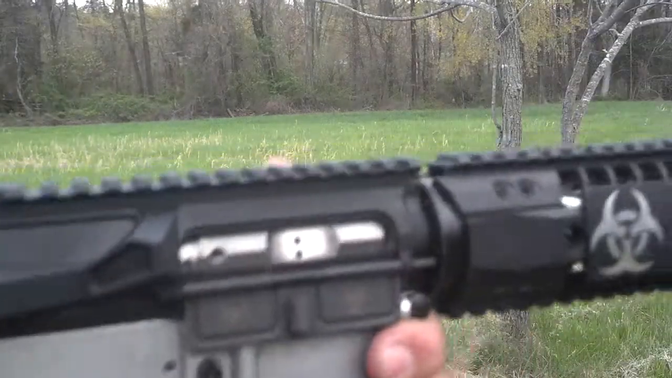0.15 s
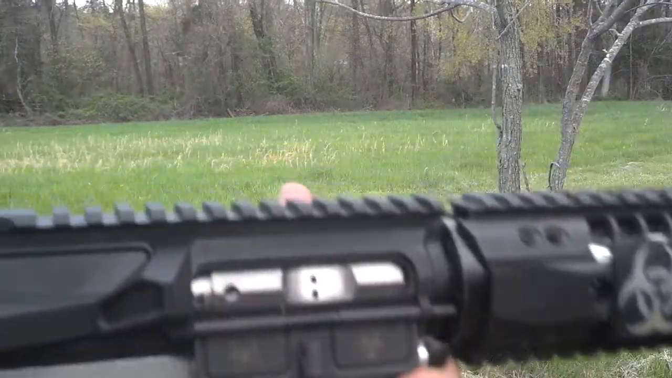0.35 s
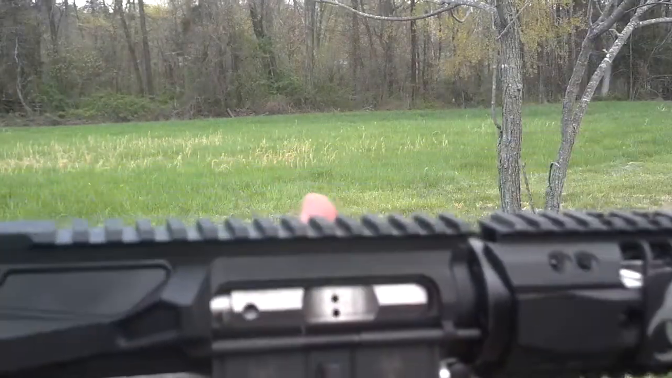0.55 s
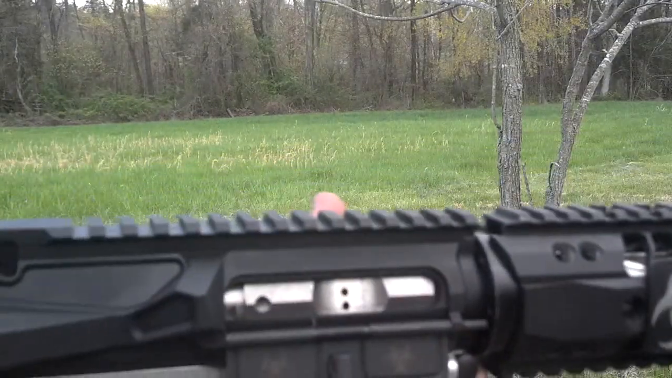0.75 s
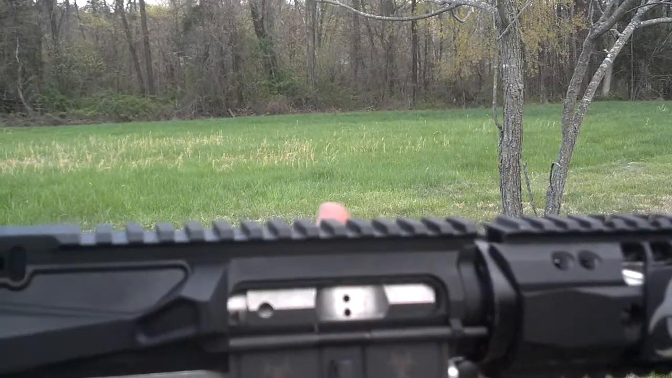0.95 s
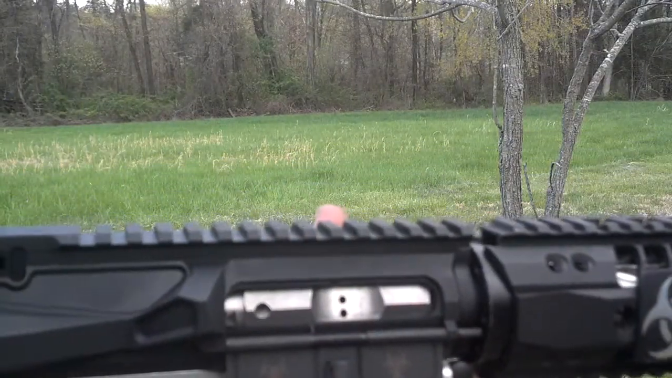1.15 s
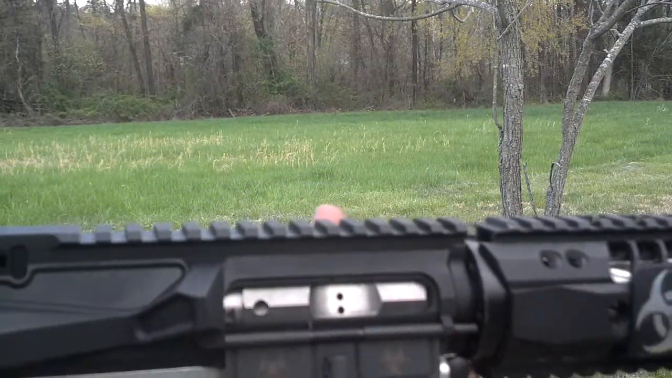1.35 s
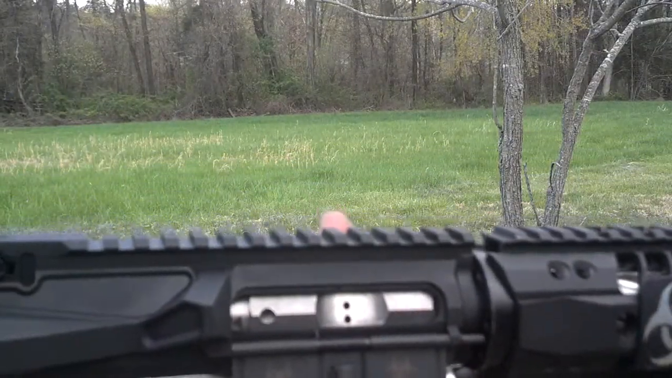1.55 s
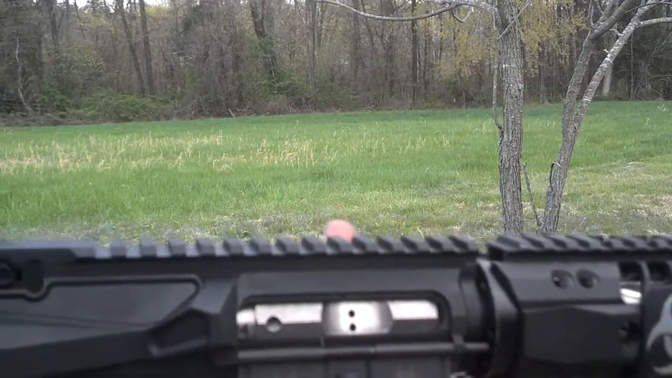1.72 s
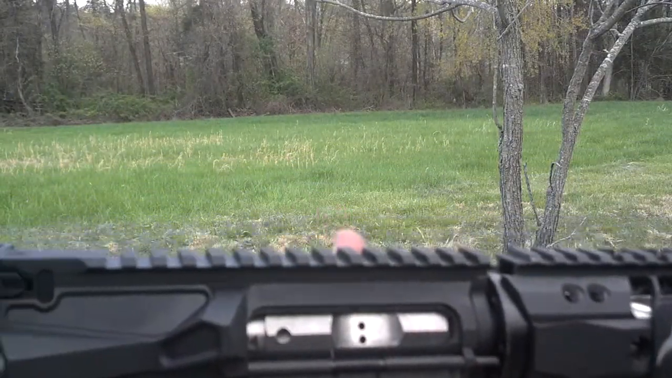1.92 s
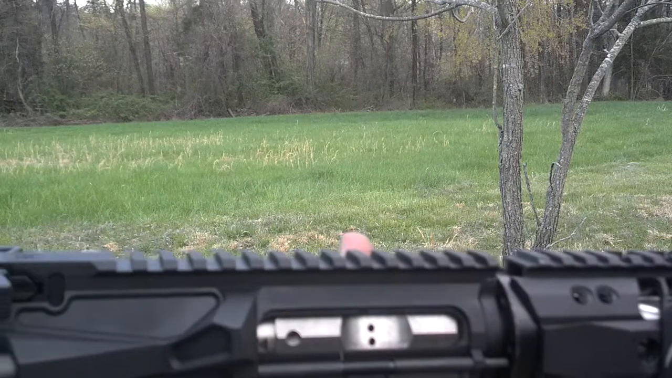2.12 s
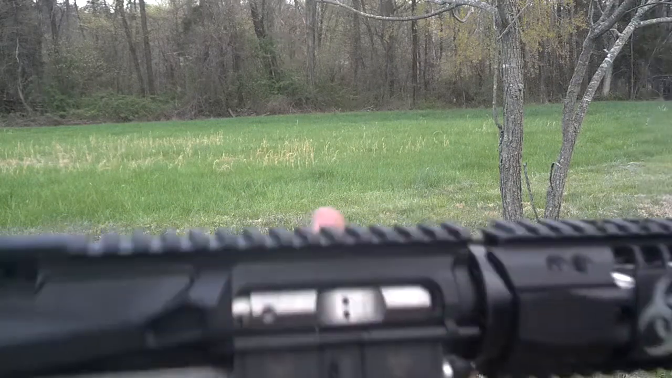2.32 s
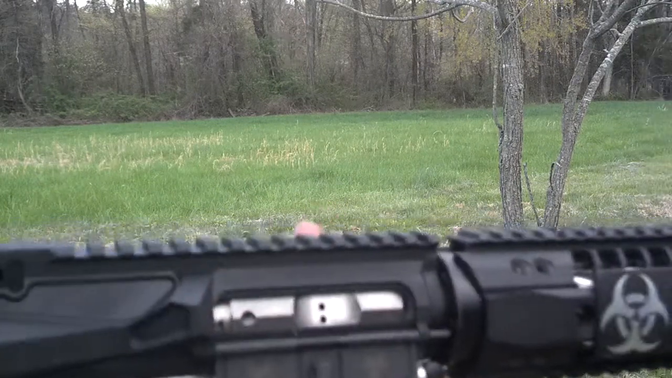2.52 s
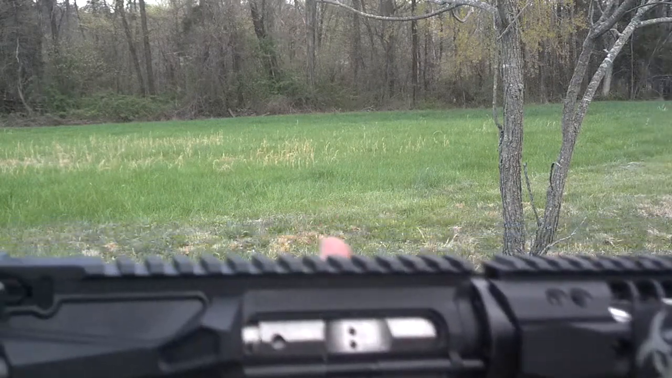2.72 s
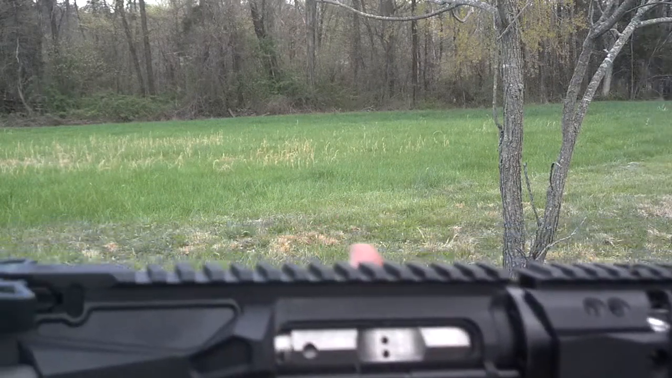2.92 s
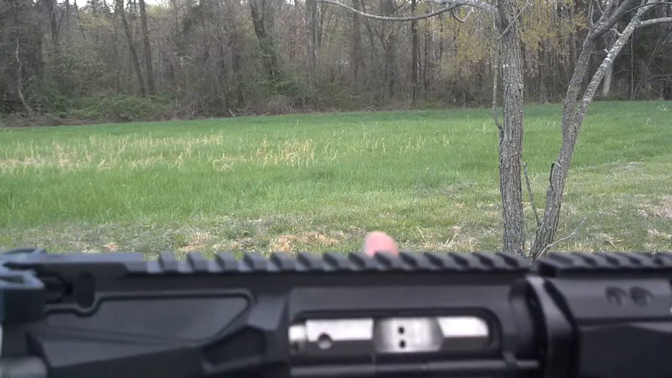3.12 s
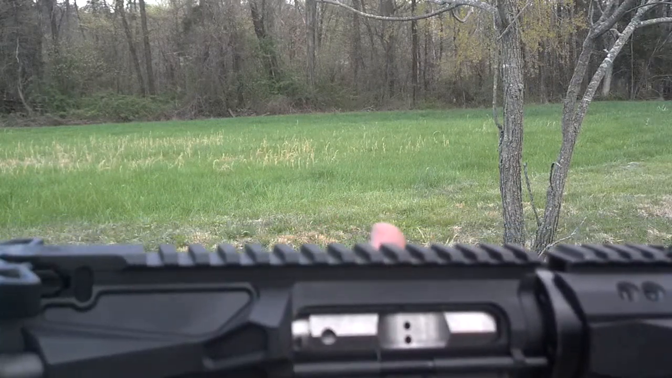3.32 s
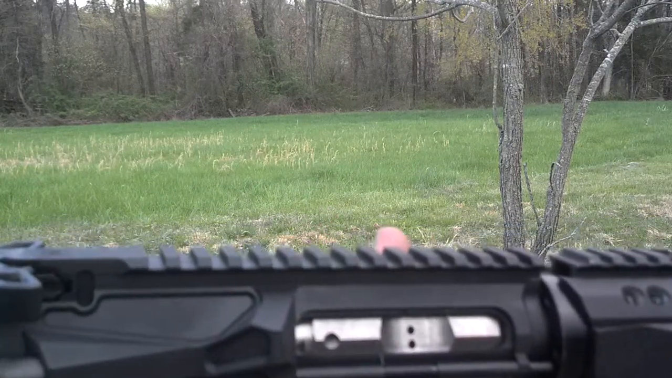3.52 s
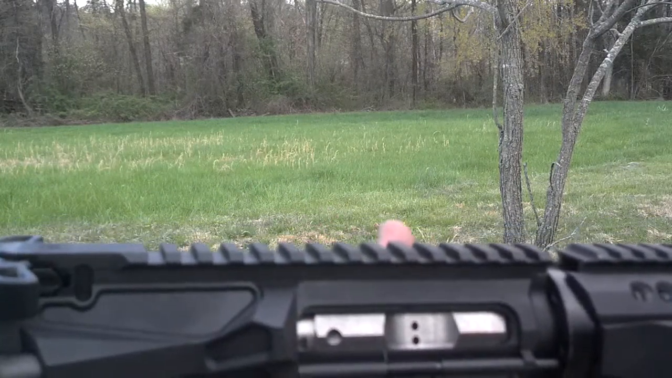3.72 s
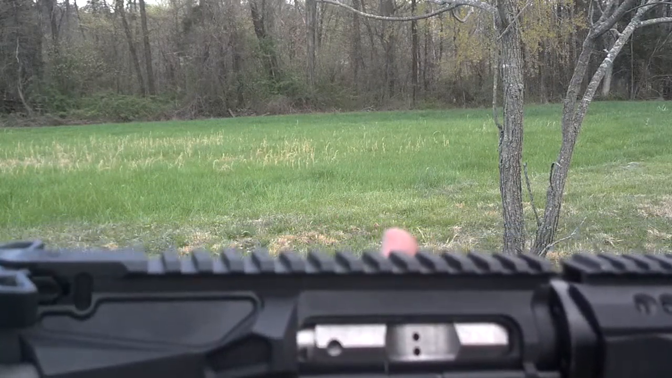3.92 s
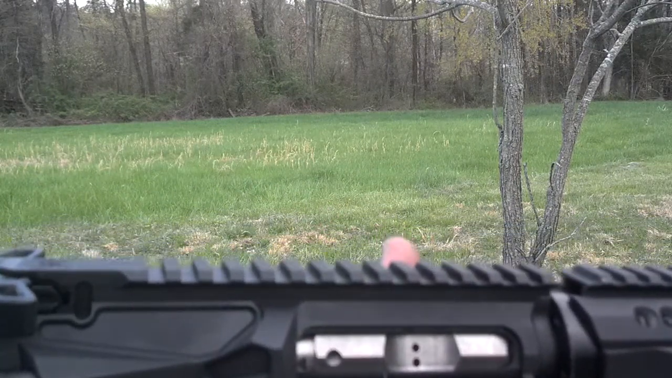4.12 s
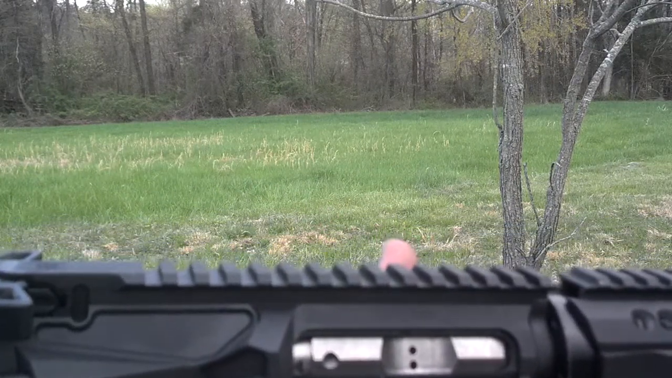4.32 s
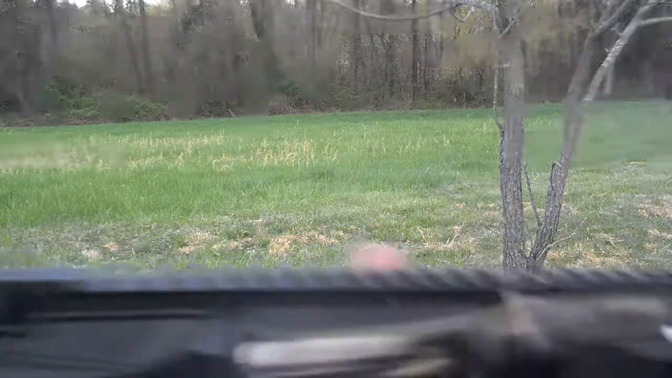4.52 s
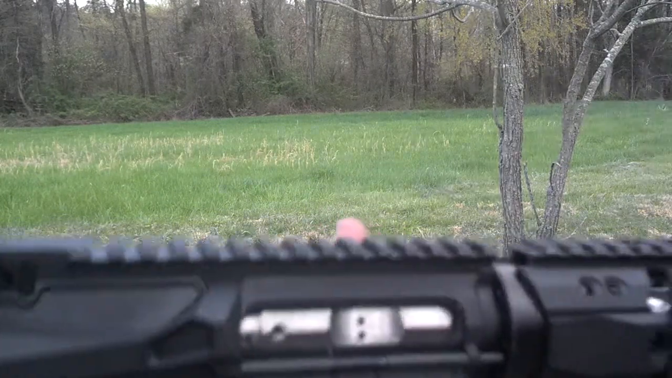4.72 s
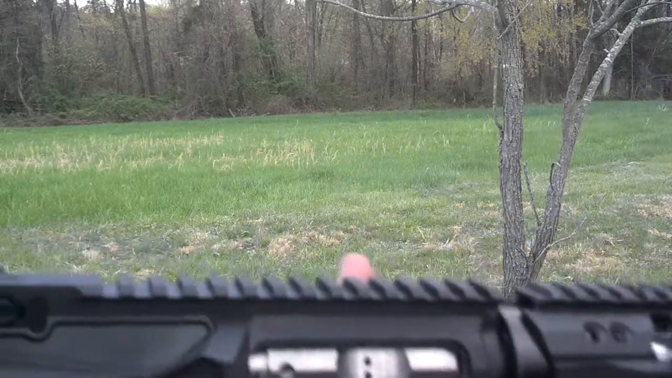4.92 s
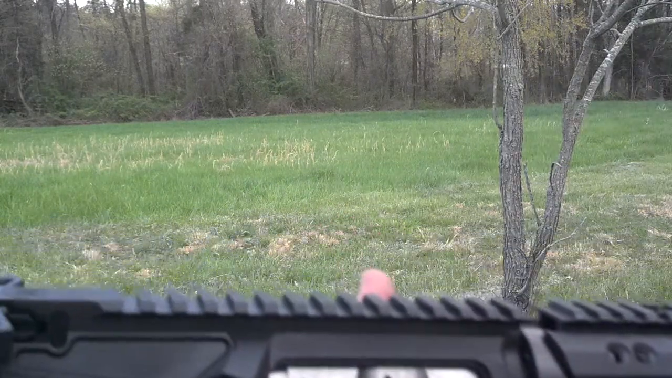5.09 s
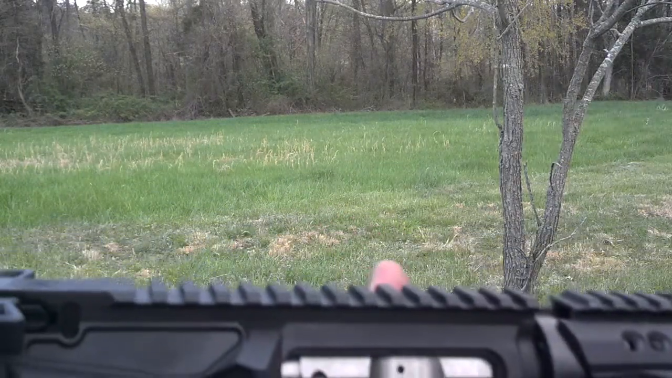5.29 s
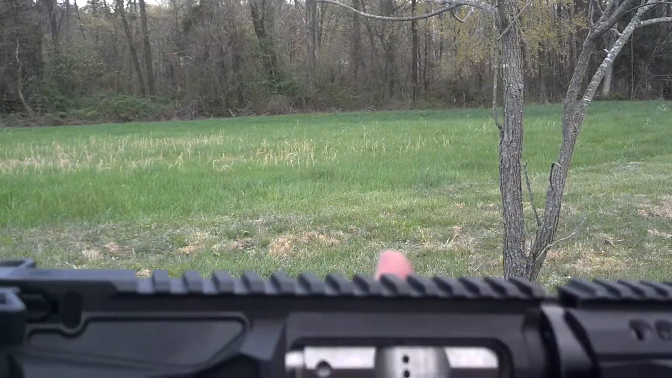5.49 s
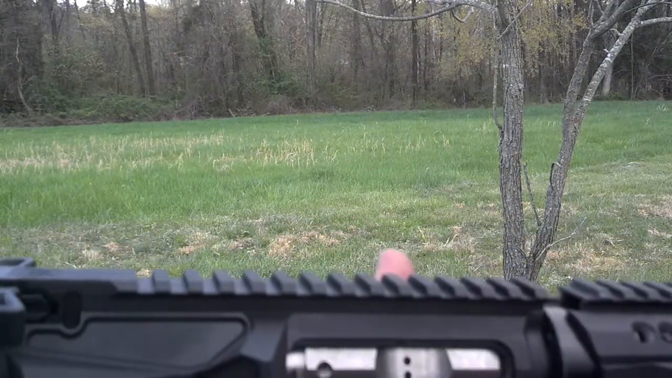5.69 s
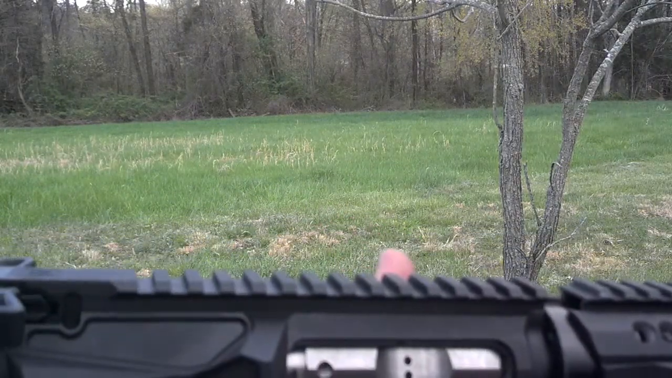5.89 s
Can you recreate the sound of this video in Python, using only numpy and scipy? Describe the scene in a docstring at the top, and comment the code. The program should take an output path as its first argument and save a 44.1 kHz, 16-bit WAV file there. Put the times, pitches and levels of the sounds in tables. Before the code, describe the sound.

Two very close rifle shots crack across a quiet field, each followed by a rolling, darkening echo off the surrounding trees, with light wind.

```python
"""Three rifle shots in a field ringed by woods, right beside a hand-held camera; the first is dying away at the start.
Each report is shaped noise that overloads two microphone ports; noise bursts make the clicks of the action.
The trees answer with a long, lumpy, darkening noise echo. Fluttering noise is the breeze over quiet field air.
A hand slides and knocks on the camera in dull noise, and a far bird whistles twice in gliding sines.
The camera widens its stereo by delayed cross-feed."""
import sys
import numpy as np
from scipy import signal
from scipy.fft import rfft, irfft, next_fast_len
from scipy.io import wavfile
from scipy.ndimage import map_coordinates

SR = 44100
rng = np.random.default_rng(int(sys.argv[2]) if len(sys.argv) > 2 else 0)


def generate_wav(sig):
    """Save sig (samples, or channels by samples) to the path in sys.argv[1] as 16-bit PCM at SR."""
    pcm = np.round(np.clip(np.atleast_2d(sig).T, -1, 1) * 32767).astype(np.int16)
    wavfile.write(sys.argv[1], SR, pcm)


N = 262395
T = np.arange(N) / SR


def amp(db):
    """Decibels to gain."""
    return 10 ** (np.asarray(db) / 20)


def unit(x):
    """Scaled to rms 1."""
    return x / np.sqrt(np.mean(x ** 2) + 1e-20)


def along(points, hz):
    """Read a curve of (frequency [Hz], value) points on a log axis."""
    point_hz, values = np.transpose(points)
    return np.interp(np.log(hz + 1), np.log(point_hz + 1), values)


def bump(t, centre, spread):
    """A bell-shaped swell of height 1."""
    return np.exp(-.5 * ((t - centre) / spread) ** 2)


def doublings(t, since):
    """How often the path of an echo has doubled after the time since."""
    return np.log2(np.maximum(t / since, 1))


def wobble(rate, size):
    """A smooth random curve, rate knots a second."""
    knots = rng.standard_normal(int(size * rate / SR) + 4)
    return map_coordinates(knots, [np.arange(size) * rate / SR])


def filtered(x, response):
    """x passed through a complex response of frequency."""
    n = x.shape[-1]
    padded = next_fast_len(n + 8192)
    hz = np.fft.rfftfreq(padded, 1 / SR)
    return irfft(rfft(x, padded) * response(hz), padded)[..., :n]


# correlation of the two ports, before each source scales it: (frequency [Hz], likeness [-1 to 1])
PORT_LIKENESS = [(100, 1), (320, 0.91), (640, 0.81), (1280, 0.052), (2500, 0.049), (6000, 0.3)]


def noise(spectrum, likeness, size):
    """Coloured noise of rms 1 at the two ports; long waves reach both more alike."""
    def response(hz):
        correlation = np.clip(likeness * along(PORT_LIKENESS, hz), -1, 1)
        turn = np.arccos(correlation) / 2  # balance of mid against side
        return amp(along(spectrum, hz)) * np.array([np.cos(turn), np.sin(turn)])
    mid, side = filtered(rng.standard_normal((2, size)), response)
    return unit(np.array([mid + side, mid - side]))


def shaded(x, treble_db, pivot_hz=800, treble_hz=4500):
    """A moving treble tilt, as of air and leaves: treble_db at treble_hz and nothing below pivot_hz."""
    hz, t, spectra = signal.stft(x, SR, nperseg=256)
    above_pivot = np.maximum(np.sqrt(hz) - np.sqrt(pivot_hz), 0)
    reach = above_pivot / (np.sqrt(treble_hz) - np.sqrt(pivot_hz))
    tilt_db = np.interp(t, np.arange(len(treble_db)) / SR, treble_db)
    tilted = spectra * amp(reach[:, None] * tilt_db)
    return signal.istft(tilted, SR, nperseg=256)[1][:, :x.shape[1]]


def burst(spectrum, likeness, rise, t60):
    """A short burst of noise that swells and dies."""
    t = T[:SR // 4]
    envelope = (1 - np.exp(-t / rise)) * amp(-60 * t / t60)
    return noise(spectrum, likeness, size=len(t)) * envelope


def from_right(x, lag_ms):
    """Sound that arrives from the right reaches the left port late."""
    lags_s = np.array([[lag_ms], [0]]) / 1000
    return filtered(x, lambda hz: np.exp(-2j * np.pi * hz * lags_s))


def add(out, s, x):
    """Mix x into out from time s on."""
    start = round(s * SR)
    lo, hi = max(start, 0), min(start + x.shape[1], N)
    out[:, lo:hi] += x[:, lo - start:hi - start]


# the shots, shared by report, boom, echo and action:
# (time [s], echo level [dB], echo hold [s], echo treble [dB], darkening sets in after the shot [s])
SHOTS = [(-0.09, -39, 0.67, 4, 0.62), (2.239, -39, 0.61, 3.5, 0.25), (4.539, -38, 0.78, 3.5, 0.49)]
# relative spectrum of the blast: (frequency [Hz], density [dB per Hz])
BLAST = [(25, -35.5), (50, -28), (85, -15), (135, 4), (220, -0.5), (350, 0), (520, 1), (700, -3),
         (1280, -10.5), (2560, -13), (5100, -21), (10000, -29.5), (15000, -38.5)]
# dull returns from nearer stands of trees, timed alike for every shot:
# (time after the shot [s], level [dB], spread [s])
REFLECTIONS = [(.061, -11, .004), (.074, -16, .005), (.094, -21, .004), (.114, -14.5, .004),
               (.128, -20, .005), (.148, -26, .009), (.183, -27, .004), (.196, -30, .004)]
REFLECTION_TREBLE_DB = -11
MUZZLE_DB, MUZZLE_S, MUZZLE_TREBLE_DB = -3.5, .0095, 2.5
# an envelope drawn like an overloaded, limited blast: it holds near full level to its edge,
# steps down as if the limiting let go, then the scatter thins with each doubling of its path
HOLD_START_S, HOLD_EDGE_S = 0.014, 0.057
EDGE_DB, HOLD_SLOPE_DB_PER_S, LET_GO_DB, SCATTER_DB_PER_DOUBLING = -11.5, 60, 6, 8.5
# treble of the held blast, and how fast it fades in the scatter beyond the edge
HOLD_TREBLE_DB, SCATTER_DARKEN_DB_PER_S = 4, 43.5
TRUNK_HZ = 260  # trunks are too thin to send back much below this pitch


def reports(lump_db=1.55, own_db=-3.5, muzzle_rise=0.00024, muzzle_fall=0.0023, let_go_s=.015):
    """Muzzle blast, its held level and near scatter; ground and trees stay put, so shots share much waveform."""
    out, t = np.zeros((2, N)), T[:SR // 2]
    muzzle = amp(MUZZLE_DB) * (1 - np.exp(-t / muzzle_rise))
    muzzle = muzzle * np.exp(-np.maximum(t - MUZZLE_S, 0) / muzzle_fall)

    tail_db = EDGE_DB - HOLD_SLOPE_DB_PER_S * np.maximum(HOLD_EDGE_S - t, 0)
    tail_db = tail_db - LET_GO_DB * np.clip((t - HOLD_EDGE_S) / let_go_s, 0, 1)
    tail_db = tail_db - SCATTER_DB_PER_DOUBLING * doublings(t, HOLD_EDGE_S)
    onset = np.clip((t / HOLD_START_S) ** 4, 0, 1)
    fade_out = np.clip((t[-1] - t) / 0.236, 0, 1)
    tail = amp(tail_db) * onset * fade_out
    tail_treble_db = HOLD_TREBLE_DB - SCATTER_DARKEN_DB_PER_S * np.maximum(t - HOLD_EDGE_S, 0)

    stands_power = sum((amp(db) * bump(t, delay, spread)) ** 2 for delay, db, spread in REFLECTIONS)
    stands = np.sqrt(stands_power)
    off_trunks = [(hz, db + 20 * np.log10(hz / np.hypot(hz, TRUNK_HZ))) for hz, db in BLAST]

    paths = [(muzzle, BLAST, [MUZZLE_TREBLE_DB]),
             (tail, off_trunks, tail_treble_db),
             (stands, off_trunks, [REFLECTION_TREBLE_DB])]
    for envelope, colour, treble_db in paths:
        shared = noise(colour, likeness=0.94, size=len(t))
        for s, *_ in SHOTS:
            own = amp(own_db) * noise(colour, likeness=1.0, size=len(t))
            blast = unit(shared + own)
            lumps = unit(amp(lump_db * wobble(rate=430, size=len(t))))  # separate reflections a few ms apart
            add(out, s, shaded(blast, treble_db) * lumps * envelope)
    return from_right(out, lag_ms=.15)


# relative spectrum of the boom: (frequency [Hz], density [dB per Hz])
BOOM = [(20, -11), (45, -11), (85, -9.5), (130, 6), (180, 2), (260, -18), (600, -39.5), (3000, -69.5)]


def booms(level_db=-17, rise=0.015, hold=.075, t60=0.17):
    """The gust of each blast buffets the two ports separately."""
    out, t = np.zeros((2, N)), T[:SR // 2]
    envelope = (1 - np.exp(-t / rise)) * amp(level_db - 60 * np.maximum(t - hold, 0) / t60)
    for s, *_ in SHOTS:
        add(out, s, envelope * noise(BOOM, likeness=0, size=len(t)))
    return out


# relative spectrum of the quiet field: (frequency [Hz], density [dB per Hz])
AIR = [(30, -17), (150, -5.5), (350, -9), (620, 2.5), (1280, -15.5), (2560, -26.5), (5100, -38),
       (10000, -44), (15500, -42)]


def field_air(level_db=-56.5):
    """The quiet air of the field, a steady coloured noise."""
    return amp(level_db) * noise(AIR, likeness=0.68, size=N)


# gusts of the breeze on the ports: (time [s], level [dB], spread [s])
GUSTS = [(.5, -50.5, 0.36), (1.45, -45.5, 0.37), (2.97, -43.5, 0.094), (3.7, -50.5, 0.15), (4.4, -45, 0.22),
         (5.05, -56, .1)]
# relative spectrum of buffeted ports, also the colour of the handling: (frequency [Hz], density [dB per Hz])
BUFFET = [(20, -26), (40, -12), (80, 4), (150, 7.5), (300, -10), (600, -32.5), (1500, -47.5), (5000, -80.5)]


def wind(gust_db=4):
    """Eddies of a light breeze flutter on each port separately."""
    breeze = sum(amp(db) * bump(T, s, spread) for s, db, spread in GUSTS)
    flutter = unit(amp(gust_db * wobble(rate=35, size=N)))
    return noise(BUFFET, likeness=0, size=N) * flutter * breeze


# relative spectrum of the echo: (frequency [Hz], density [dB per Hz])
ECHO = [(30, -30.5), (90, -3), (200, -13.5), (350, -1.5), (580, 3.5), (900, -3.5), (1280, -5.5),
        (2000, -13.5), (2800, -13.5), (5100, -25), (10000, -54), (15000, -71)]
# the tree line and deeper banks of trees swell every roll: (time after the shot [s], swell [dB], spread [s])
BANKS = [(0.322, 10, 0.028), (0.741, 1, 0.069), (1.28, 1.5, 0.076)]
# single slaps from trunks in the wood: (time [s], level before the slap trim [dB])
SLAPS = [(0.489, -21.5), (0.523, -25.5), (0.681, -32.5), (5.07, -22.5), (5.176, -25.5)]
# the roll sets in, holds while the rim of the field answers, then thins with each doubling of its path
ROLL_START_S, ROLL_FULL_S, ROLL_DB_PER_DOUBLING = 0.1, 0.45, 10


def woods(flutter_db=.5, darken_db=22, clear_hz=1100, slap_db=-1):
    """Countless trunks answer in a lumpy roll; echoes from deep in the wood lose darken_db of treble over 1 s."""
    out, t = np.zeros((2, N)), T[:int(2.6 * SR)]
    banks_db = sum(db * bump(t, delay, spread) for delay, db, spread in BANKS)
    swell = np.interp(t, [ROLL_START_S, ROLL_FULL_S, 2.3, 2.55], [0, 1, 1, 0])
    for s, echo_db, hold, treble_db, deep in SHOTS:
        roll_db = echo_db + banks_db - ROLL_DB_PER_DOUBLING * doublings(t, hold)
        lumps_db = 1.7 * wobble(rate=170, size=len(t))
        lumps = unit(amp(lumps_db + flutter_db * wobble(rate=25, size=len(t))))
        darkening_db = treble_db - darken_db * np.clip(t - deep, 0, 1)
        roll = shaded(noise(ECHO, likeness=0.85, size=len(t)), darkening_db, pivot_hz=clear_hz)
        add(out, s, roll * swell * lumps * amp(roll_db))
    for s, db in SLAPS:
        add(out, s, amp(db + slap_db) * burst(ECHO, likeness=1, rise=0.00061, t60=0.021))
    return from_right(out, lag_ms=0.048)


# hammer fall, then a click as the action settles, in every shot:
# (time after the shot [s], level before the action trim [dB], t60 [s], treble tilt [dB per octave])
CYCLE = [(-.0082, -9.5, .008, 4.5), (0.1945, -25, 0.0047, -3)]
# trigger resets and ejected cases striking:
# (time [s], level before the action trim [dB], t60 [s], treble tilt [dB per octave])
ACTION = [(0.128, -28.5, 0.021, -2), (0.4894, -32, 0.008, -9), (2.379, -18, 0.059, -4.5),
          (2.386, -29, 0.022, -9.5), (2.461, -32, 0.018, 0), (4.724, -32.5, 0.041, -0.5)]
# relative spectrum of struck steel before the tilt: (frequency [Hz], density [dB per Hz])
STEEL = [(300, -11), (1200, -5), (3500, 2), (7000, -4), (11000, -9), (15000, -19.5)]


def action(level_db=2):
    """Steel parts and cases strike with short, dry clicks, each with its own tilt of the treble."""
    out = np.zeros((2, N))
    cycles = [(s + delay, *click) for s, *_ in SHOTS for delay, *click in CYCLE]
    for s, db, t60, tilt_db in cycles + ACTION:
        colour = [(hz, level + tilt_db * np.log2(hz)) for hz, level in STEEL]
        add(out, s, amp(db + level_db) * burst(colour, likeness=0.82, rise=t60 / 25, t60=t60))
    return out


# soft knocks of the hand on the camera body: (time [s], peak before the handling trim [dB])
KNOCKS = [(0.999, -32), (1.081, -32.5), (1.273, -28), (1.316, -28), (1.365, -29), (1.403, -33),
          (1.423, -23), (1.526, -29), (1.585, -26.5), (1.627, -29.5), (3.627, -39), (3.919, -42),
          (4.018, -34.5), (4.358, -33), (4.404, -39.5)]
# a knock of DULL_DB in the table is a plain thud; harder ones sound higher
DULL_DB, KNOCK_OCTAVES_PER_DB = -35.5, 0.0252
# the slide of the hand; its pitch is a ratio to the plain thud
SLIDE_START_S, SLIDE_END_S, SLIDE_DB, SLIDE_PITCH = 1.25, 1.68, -42, 1.53


def handling(level_db=6, scuff_db=3, slide_rough_db=4):
    """The hand slides unevenly on the camera; each knock trails off in a scuff, and a harder one sounds higher."""
    pressure = np.clip(np.minimum(T - SLIDE_START_S, SLIDE_END_S - T) / 0.03485, 0, 1)
    rub = noise([(hz * SLIDE_PITCH, level) for hz, level in BUFFET], likeness=0.09, size=N)
    roughness = unit(amp(slide_rough_db * wobble(rate=60, size=N)))
    out = amp(SLIDE_DB) * pressure * rub * roughness
    for s, db in KNOCKS:
        pitch = 2 ** (KNOCK_OCTAVES_PER_DB * (db - DULL_DB))
        colour = [(hz * pitch, level) for hz, level in BUFFET]
        knock = burst(colour, likeness=0.21, rise=0.00075, t60=0.066)
        knock = knock * amp(scuff_db * wobble(rate=130, size=knock.shape[1]))
        add(out, s, amp(db + level_db) * knock / np.abs(knock).max())
    return out


# the bird's whistles: (time [s], length before the decay [s], level [dB])
WHISTLES = [(3.913, 0.22, -75), (4.42, .2, -72.5)]
# each whistle scoops up towards its pitch and sags, then lingers among the trees
WHISTLE_HZ, SCOOP_HZ, SCOOP_S, SAG_HZ_PER_S = 3800, 380, .022, 700
WHISTLE_ATTACK_S, WHISTLE_T60_S = 0.047, .6


def bird(waver_hz=60, flicker_db=3):
    """Two thin far whistles, sines whose pitch and level waver, blurred by the trees."""
    out, t = np.zeros((2, N)), T[:SR]
    for s, length, db in WHISTLES:
        pitch_hz = WHISTLE_HZ - SCOOP_HZ * np.exp(-t / SCOOP_S) - SAG_HZ_PER_S * np.minimum(t, length)
        pitch_hz = pitch_hz + waver_hz * wobble(rate=340, size=len(t))
        phase = 2 * np.pi * np.cumsum(pitch_hz) / SR
        decay = amp(db - 60 * np.maximum(t - length, 0) / WHISTLE_T60_S)
        envelope = np.minimum(t / WHISTLE_ATTACK_S, 1) * decay
        flicker = amp(flicker_db * wobble(rate=120, size=len(t)))
        add(out, s, (envelope * flicker * np.sin(phase))[None])
    return out


def scene():
    """The shots and their echoes over the quiet air of the field, at the two ports."""
    shots = reports() + booms() + woods() + action()
    return shots + field_air() + wind() + handling() + bird()


def record(dry, clip_db=-12.5, feed=1.0, delay_ms=0.3632, bass_hz=45, top_hz=15950):
    """The ports overload; taking a delayed copy of the other channel from each widens and combs the sound."""
    ports = amp(clip_db) * np.tanh(dry / amp(clip_db))
    other = filtered(ports[::-1], lambda hz: np.exp(-2j * np.pi * hz * delay_ms / 1000))
    wide = filtered(ports - feed * other, lambda hz: 1j * hz / (bass_hz + 1j * hz))
    return filtered(wide, lambda hz: 1 / np.sqrt(1 + (hz / top_hz) ** 160))  # steep treble cut


dry = scene()
out = record(dry)
generate_wav(out)
```